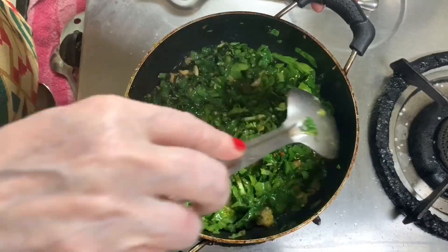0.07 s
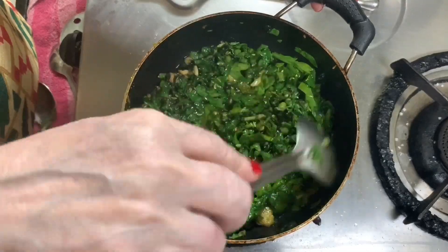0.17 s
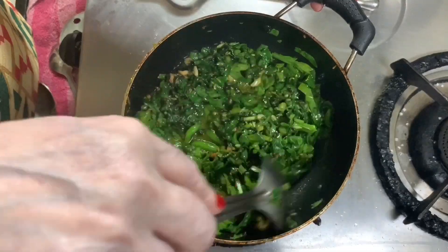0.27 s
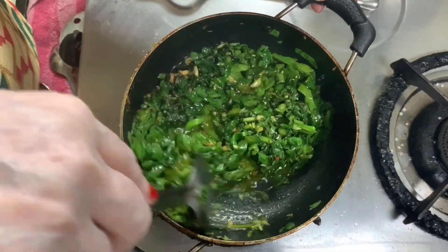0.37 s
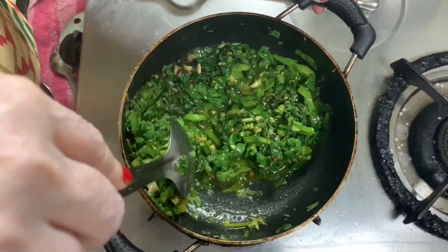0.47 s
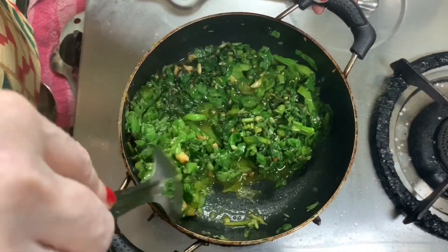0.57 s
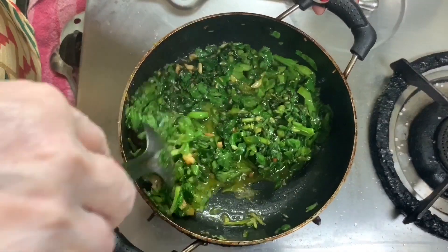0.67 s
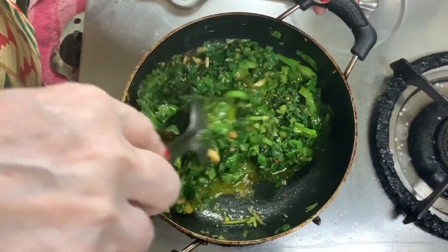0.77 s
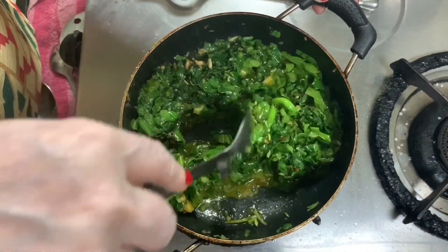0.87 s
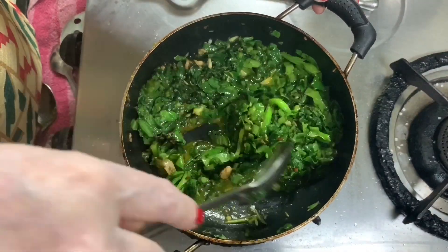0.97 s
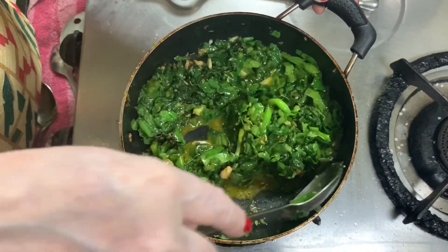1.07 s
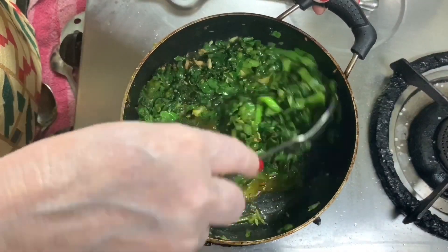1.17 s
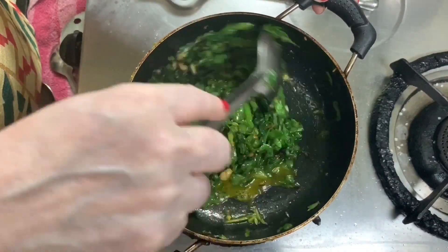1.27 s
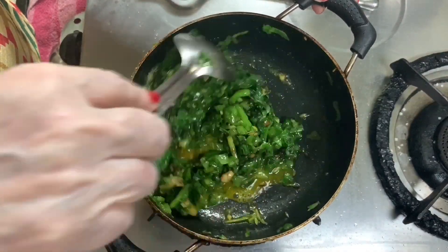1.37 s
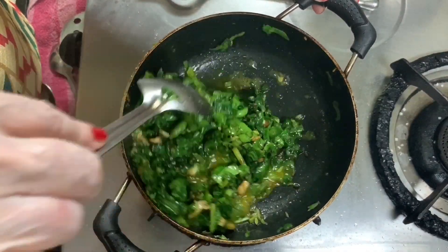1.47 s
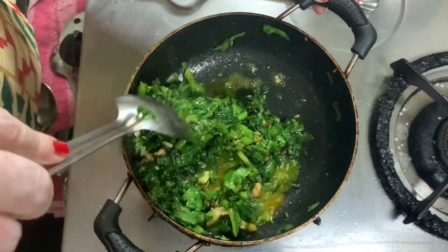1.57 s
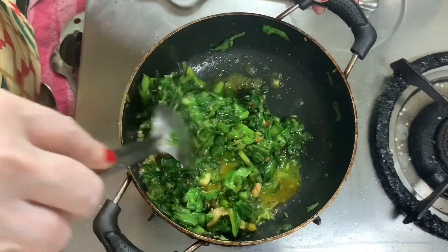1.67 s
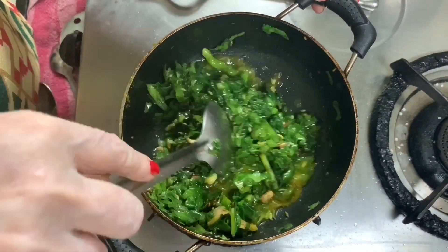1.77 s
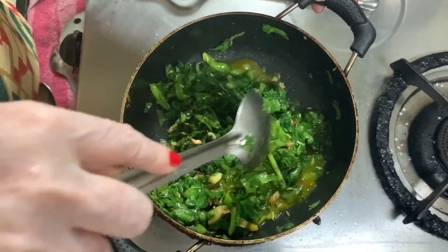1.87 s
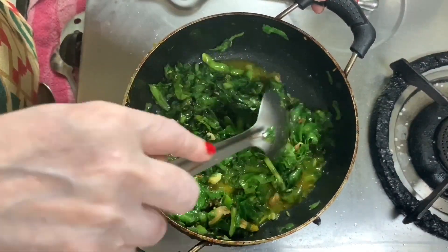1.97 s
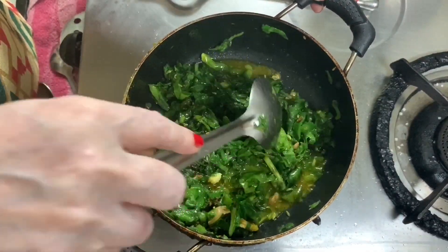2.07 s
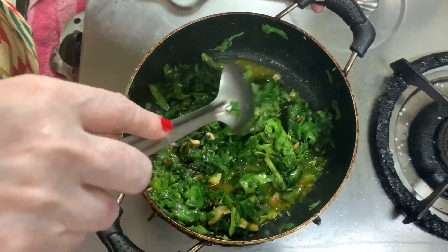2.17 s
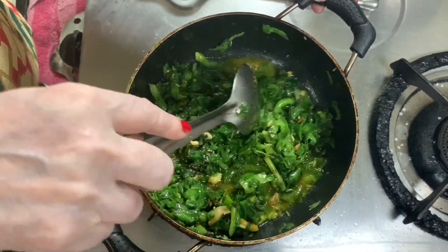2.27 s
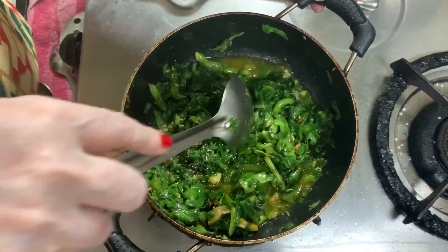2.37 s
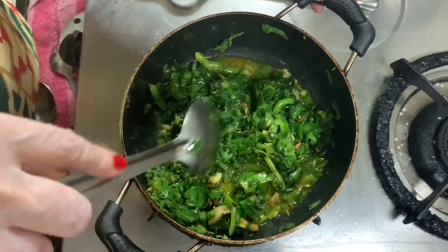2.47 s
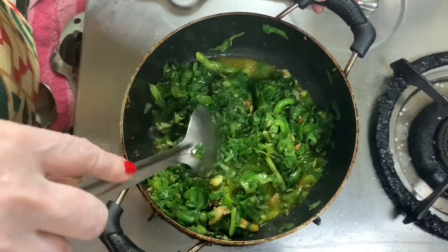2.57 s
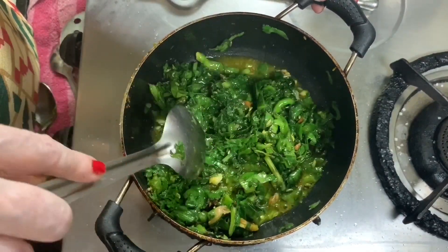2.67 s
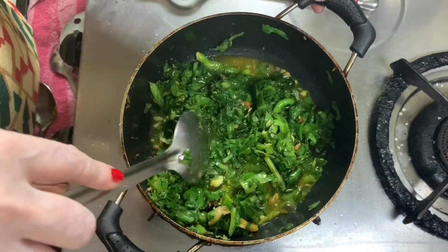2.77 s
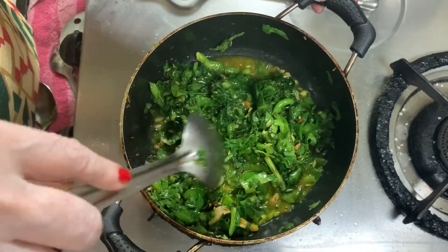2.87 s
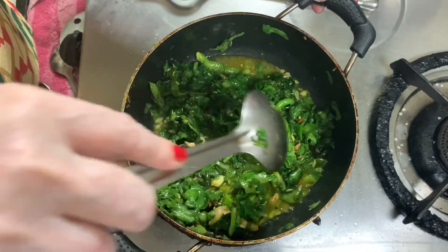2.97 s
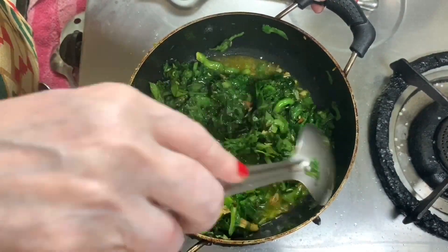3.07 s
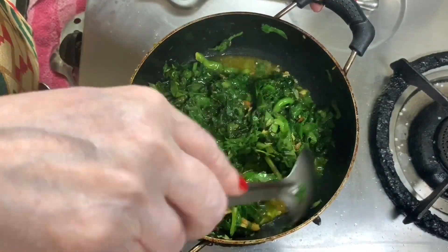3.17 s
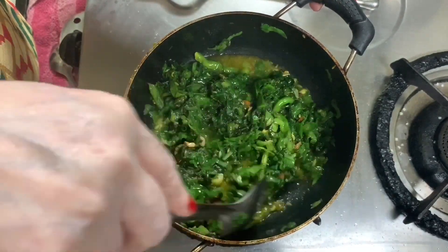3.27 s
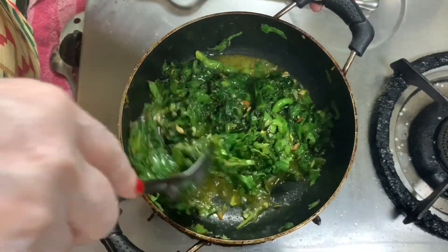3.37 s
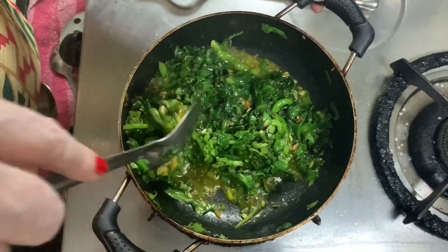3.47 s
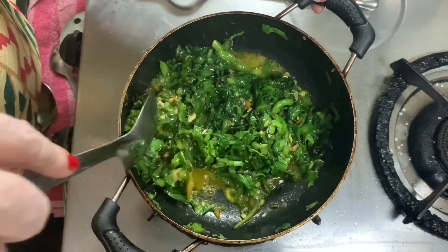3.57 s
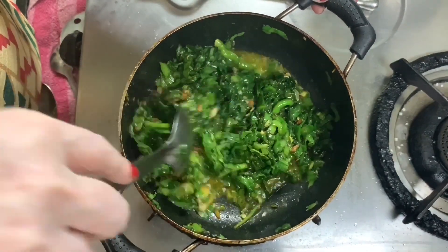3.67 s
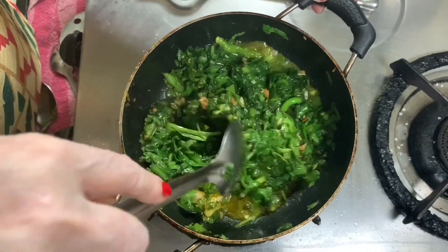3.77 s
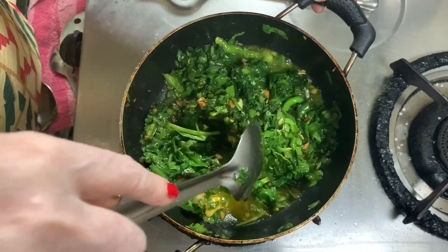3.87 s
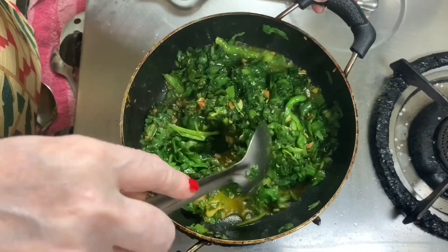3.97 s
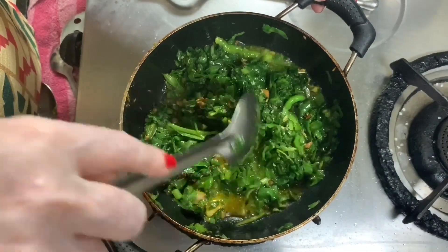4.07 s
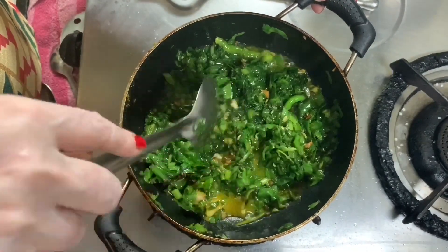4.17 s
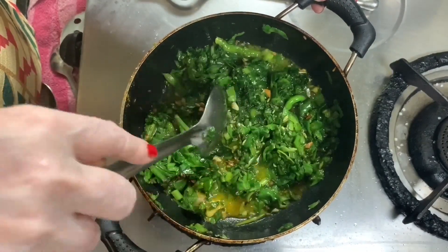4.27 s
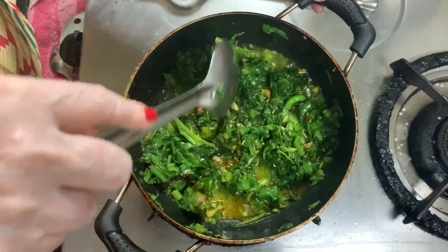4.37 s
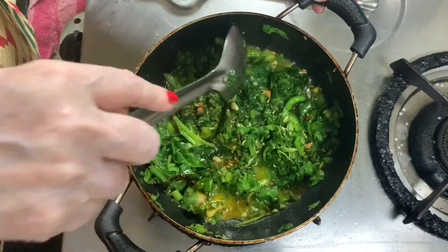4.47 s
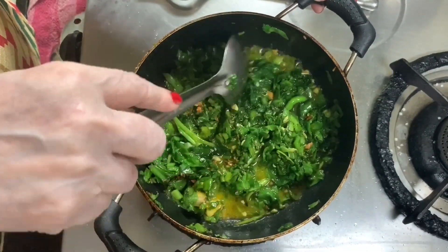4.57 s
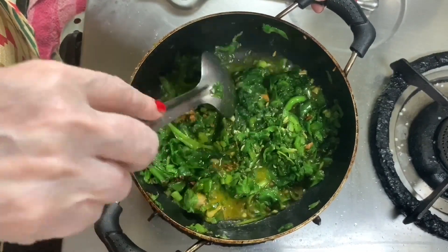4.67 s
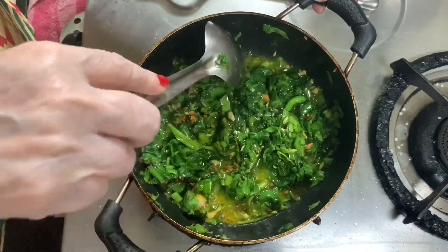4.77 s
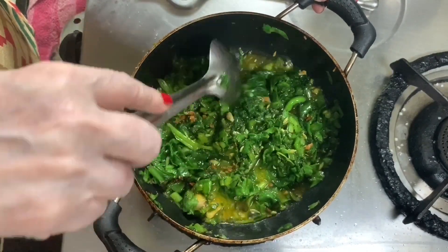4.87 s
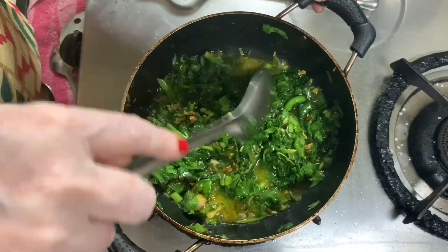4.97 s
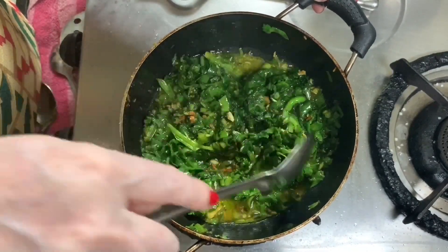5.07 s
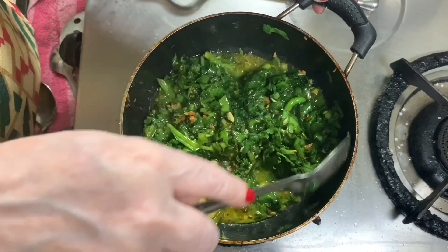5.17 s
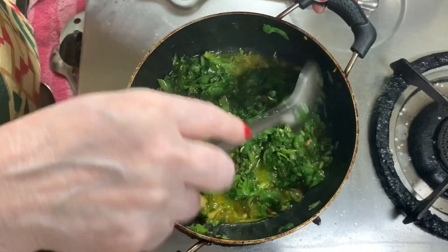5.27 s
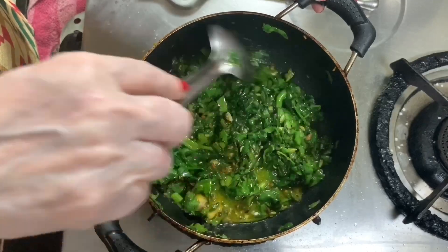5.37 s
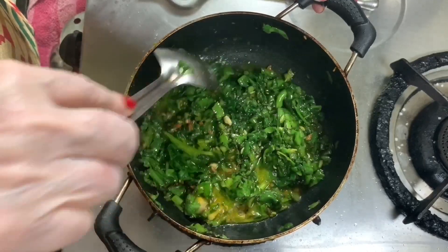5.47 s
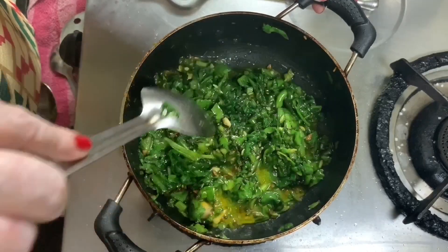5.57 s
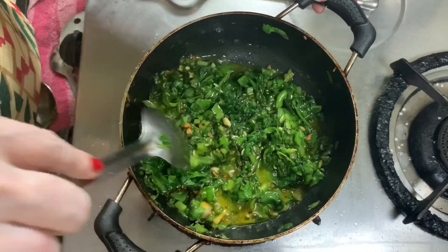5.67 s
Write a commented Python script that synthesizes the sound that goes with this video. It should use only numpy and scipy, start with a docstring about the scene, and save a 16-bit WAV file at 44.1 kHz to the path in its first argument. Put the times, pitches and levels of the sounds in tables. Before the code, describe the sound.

Soft high fizz with finer crackle runs throughout, strongest at first and thinning later. Over it a spoon strikes and drags in a pan: bright taps, dull food-cushioned knocks, short groaning scrapes with tiny squeals. A lull in the middle holds a few oil pops, then louder clanks return, followed by hollow rocking thuds and a last blunt blow. Close, mono, dry with a brief room tail.

```python
"""A steel spoon stirs wet greens in a non-stick pan on a stove, in a small kitchen.
Spoon: filtered cracks and pan modes make clinks and knocks; stick-slip noise makes scrapes and squeals.
Pan: short tone-and-noise thuds rock it on its grate.
Frying: three layers of random snaps, coloured by the bowl, plus a sinking resonance in each opened gap.
Single oil spits are decaying noise bursts; decaying noise tails add the kitchen around spoon and pan."""
import sys
import numpy as np
from scipy import signal
from scipy.fft import rfft, irfft, next_fast_len
from scipy.io import wavfile
from scipy.ndimage import map_coordinates

SR = 44100
rng = np.random.default_rng(int(sys.argv[2]) if len(sys.argv) > 2 else 0)


def to_wav(s):
    """Save 16-bit WAV."""
    ch = np.atleast_2d(s).T  # columns
    pcm = np.round(np.clip(ch, -1, 1) * 32767)  # PCM
    wavfile.write(sys.argv[1], SR, pcm.astype(np.int16))


N = 251370


def amp(db):
    """Decibels to gain."""
    return 10 ** (np.asarray(db) / 20)


def unit(x):
    """Scale to rms 1."""
    return x / np.sqrt(np.mean(x ** 2) + 1e-20)


def unit_energy(x):
    """Scale to energy 1."""
    return x / (np.linalg.norm(x) + 1e-12)


def along(points, hz):
    """Read (Hz, value) points on a log-frequency axis."""
    f, v = np.transpose(points)
    return np.interp(np.log(hz + 1), np.log(f + 1), v)


def wobble(knots_per_s):
    """Smooth random curve through normally distributed knots."""
    knots = rng.standard_normal(int(N * knots_per_s / SR) + 4)
    return map_coordinates(knots, [np.arange(N) * knots_per_s / SR], order=2)


def coloured(x, points):
    """Filter x causally (minimum phase, from the folded cepstrum) to the given spectrum."""
    m = 2 * next_fast_len(len(x) // 2 + 2048)
    gain = amp(along(points, np.fft.rfftfreq(m, 1 / SR)))
    cepstrum = irfft(np.log(gain))
    cepstrum[1:m // 2] *= 2
    cepstrum[m // 2 + 1:] = 0
    response = np.exp(rfft(cepstrum))
    return irfft(rfft(x, m) * response, m)[:len(x)]


def add(track, s, sound):
    """Mix a sound into the track at time s."""
    part = track[max(round(s * SR), 0):][:len(sound)]
    part += sound[:len(part)]


def crackle(snaps_per_s, spread_db, hiss_db):
    """Random one-sample snaps of uneven size over a smooth hiss."""
    hits = rng.random(N) < snaps_per_s / SR
    sizes = amp(spread_db * np.clip(rng.standard_normal(N), -2, 2))
    snaps = hits * rng.choice([-1, 1], N) * sizes
    return unit(unit(snaps) + amp(hiss_db) * rng.standard_normal(N))


def resonance(hz, width_hz):
    """Noise of rms 1 ringing in a resonance whose centre may move."""
    lowpass = signal.butter(2, width_hz / 2, fs=SR, output="sos")
    narrow = signal.sosfilt(lowpass, rng.standard_normal((2, N)))
    phase = 2 * np.pi * np.cumsum(hz) / SR
    return unit(narrow[0] * np.cos(phase) + narrow[1] * np.sin(phase))


# frying strength: (time [s], level [dB])
FRYING_STRENGTH = [(0.0, -31), (0.55, -33.5), (0.95, -36), (1.2, -34), (1.65, -33.5), (2.05, -38),
                   (2.95, -39.5), (3.25, -37), (3.62, -36), (4.1, -40), (4.65, -42), (5.28, -38),
                   (5.5, -42)]
# fine-bubble spectrum: (frequency [Hz], level [dB])
FIZZ_COLOUR = [(2000, -18.5), (5600, -11.5), (6200, -4), (6850, 0.5), (7300, -6), (9600, -0.5),
               (10700, 0.5), (11350, -4), (12400, -2.5), (14000, -5), (15500, 3)]
# larger-bubble spectrum: (frequency [Hz], level [dB])
BUBBLING_COLOUR = [(500, -26), (1900, -19.5), (2250, -5), (2600, 5.5), (3000, 5.5), (3450, 0), (3900, 14.5),
                   (4300, 0), (4700, 5), (5150, 12.5), (5700, 2), (9000, -7.5)]
# juice spectrum: (frequency [Hz], level [dB])
SIMMER_COLOUR = [(25, -14), (100, -8.5), (200, -10.5), (310, 4.5), (450, -2.5), (600, 11.5), (950, 7.5),
                 (1130, -4.5), (1350, 7), (1560, 0.5), (1800, 8.5), (4000, -18)]
CALM_DB = -40  # frying strength when the greens lie still
BUBBLING_DB_PER_DB, SIMMER_DB_PER_DB = 1.16, 0.18  # growth with frying strength


def sizzle(fizz_db=-39, bubbling_db=-48.5, simmer_db=-52.5):
    """Steam bubbles burst: the finest fizz, larger ones bubble, juice simmers under the leaves."""
    times, strengths = np.transpose(FRYING_STRENGTH)
    flare_db = np.interp(np.arange(N) / SR, times, strengths) - CALM_DB
    surge_db = 0.5 * wobble(8.5)
    fine = unit(coloured(crackle(2200, spread_db=-3.0, hiss_db=2.5), FIZZ_COLOUR))
    coarse = unit(coloured(crackle(1200, spread_db=0.5, hiss_db=1.0), BUBBLING_COLOUR))
    juice = unit(coloured(crackle(240, spread_db=6.0, hiss_db=9), SIMMER_COLOUR))
    fine_db = flare_db + fizz_db + surge_db + 1.35 * wobble(40)
    coarse_db = BUBBLING_DB_PER_DB * flare_db + bubbling_db + surge_db + 1.76 * wobble(25)
    juice_db = SIMMER_DB_PER_DB * flare_db + simmer_db + 0.48 * wobble(11)
    return fine * amp(fine_db) + coarse * amp(coarse_db) + juice * amp(juice_db)


# bowl air resonances: (frequency [Hz], 1/e half-width [Hz], lift [dB])
BOWL_RESONANCES = [(2540, 290, 4.5), (4570, 71, 9), (5280, 53, -3.5), (6084, 50, 10.5), (6880, 510, 7),
                   (7775, 380, 8), (8400, 105, 11), (9070, 420, 9), (9880, 210, 1.5), (10710, 900, 7.5),
                   (12500, 290, 11.5), (13760, 430, 10), (14000, 100, -2), (14580, 200, 15.5),
                   (16130, 470, 9)]


def in_bowl(x, echo=0.27, delay_s=0.000909, sway=0.159):
    """The bowl lifts its resonances; an echo off the moving spoon adds a drifting comb."""
    m = next_fast_len(N + SR // 4)
    f = np.fft.rfftfreq(m, 1 / SR)
    lift_db = sum(db * np.exp(-((f - hz) / width) ** 2) for hz, width, db in BOWL_RESONANCES)
    lifted = irfft(rfft(x, m) * amp(lift_db), m)[:N]
    lag = delay_s * SR * np.exp(sway * wobble(2.42))  # samples
    reflected = map_coordinates(lifted, [np.arange(N) - lag])
    return np.std(x) * unit(lifted + echo * reflected)


# gaps opened in the greens: (time [s], relative level [dB])
GAP_OPENINGS = [(0.079, -51), (0.701, -44), (1.05, -45.5), (1.66, -45), (2.15, -44), (2.7, -47),
                (3.4, -48.5), (4.069, -46.5)]
GAP_OPEN_S, GAP_CLOSE_DB_PER_S = 0.01, 15.5
GAP_START_HZ, GAP_HZ, GAP_SINK_S = 4420, 3914, 0.19  # start, end and time constant of the pitch


def hollow(hollow_db=-2, drift=0.014):
    """Sizzle rings in each gap; pitch sinks as the gap widens, level falls as leaves close over it."""
    t = np.arange(N) / SR
    hz, level = np.full(N, float(GAP_HZ)), np.zeros(N)
    for s, db in GAP_OPENINGS:
        age = np.maximum(t - s, 0)
        sinking_hz = GAP_HZ + (GAP_START_HZ - GAP_HZ) * np.exp(-age / GAP_SINK_S)
        hz = np.where(t >= s, sinking_hz, hz)
        opening = 1 - np.exp(-age / GAP_OPEN_S)
        level = np.maximum(level, amp(db - GAP_CLOSE_DB_PER_S * age) * opening)
    return amp(hollow_db) * level * resonance(hz * (1 + drift * wobble(6.2)), width_hz=370)


# pan and spoon modes: (frequency [Hz], mean level [dB], t60 before extra damping [s])
PAN_MODES = [(270, -6, .2), (394, -2, .2), (583, -2, .16), (745, -8, .11), (830, -6, .12), (1015, -9, .15),
             (1170, -11, .13), (1320, -5, .16), (1720, -6, .2), (1815, 0, .12), (2020, -6, .12),
             (2180, -6, .1), (2400, -8, .1), (2560, -7, .1), (2800, -9, .1), (3100, -9, .14),
             (3250, -8, .14), (3850, -7, .14), (4170, -8, .14), (4685, 0, .17), (6200, -9, .1),
             (7070, -2, .12), (7600, -8, .15), (8770, -12, .12), (9595, -3, .14), (9860, -4, .24),
             (10050, -3, .16), (12900, -11, .15)]


def pan_ring(scatter_db, damping):
    """Sum the decaying modes; random strengths and phases stand for where the spoon touches."""
    t = np.arange(SR // 3) / SR
    hz, db, t60 = np.transpose(PAN_MODES)[:, :, None]
    level_db = db + scatter_db * rng.standard_normal(hz.shape) - 60 * damping * t / t60
    tones = np.sin(2 * np.pi * (hz * t + rng.random(hz.shape)))
    return unit_energy(np.sum(amp(level_db) * tones, axis=0))


# spoon against pan; bright = bare wall, dull = food-covered base:
# (time [s], strength [dB], brightness [dB], clank over strength [dB], clank upper limit [Hz])
CONTACT_EVENTS = [(0.0894, -20.5, 15.5, -1, 9500), (0.159, -30.5, -5, 1, 5000),
                  (0.3392, -27.5, -10.5, 2, 3140), (0.562, -23, 5.5, 5, 8040), (1.094, -39.5, 14, 7, 4500),
                  (1.179, -37.5, 2, 2, 3800), (1.592, -24, 9, -0.5, 9000), (3.0593, -18.5, 9.5, -1.5, 9200),
                  (3.169, -30, -6, -3.5, 3040), (3.247, -28.5, 4, 2.5, 1750), (3.2645, -22, -10.5, 2, 1470),
                  (3.533, -14.5, 6, 1.5, 4500), (3.9, -18.5, -13.5, -4, 5360), (5.155, -40, 10, 1, 6000),
                  (5.22, -32.5, 6.5, 4.5, 3970), (5.277, -44, -2, 6, 2400), (5.673, -10.5, -5, 0.5, 2130)]
# base knock spectrum: (frequency [Hz], level [dB])
KNOCK_COLOUR = [(40, -45), (130, -22), (205, -38), (260, -5), (400, -0.5), (600, 4), (800, 6.5), (1050, 2),
                (1380, 8), (1580, -15), (2500, -50), (8000, -67)]
# clank spectrum: (frequency [Hz], level [dB])
CLANK_COLOUR = [(300, -30), (1200, -28), (1580, -9), (1780, 1.5), (2250, 1.5), (2800, 0), (4800, 5.5),
                (5600, 3.5), (12000, -54.5)]
# tick and oil-pop spectrum: (frequency [Hz], level [dB])
TICK_COLOUR = [(800, -97), (4000, -20), (6000, 1.5), (7200, 4), (10000, 5.5), (11500, 0), (13000, 8.5),
               (16000, -18.5)]
BASE_HZ, BASE_OCT, BASE_DB_PER_DB = 1210, 0.31, 0.87  # band that grows as contacts dull
RING_DB, RING_DB_PER_DB = -3, 0.3  # ring relative to crack; grows with brightness
CRACK_T60_S, CRACK_OCT_PER_DB = 0.015, 0.1131  # t60 at zero brightness; longer on bare metal


def contacts(knock_db=23, clank_db=24, tick_db=23, rise_s=0.00044, grit_db=-9):
    """Each contact is a push, a crack of tiny bounces and a ring; food dulls and damps it."""
    out, t = np.zeros(N), np.arange(SR // 3) / SR
    push = signal.unit_impulse(len(t))
    for s, strength, bright, clank, reach_hz in CONTACT_EVENTS:
        ring_db = RING_DB + RING_DB_PER_DB * bright
        crack_t60 = CRACK_T60_S * 2 ** (CRACK_OCT_PER_DB * bright)
        envelope = amp(-60 * t / crack_t60) * (1 - np.exp(-t / rise_s))
        crack = unit_energy(rng.standard_normal(len(t)) * envelope)
        ring = pan_ring(scatter_db=2.5, damping=2.5)
        cushioned = [(hz, db - 10 * np.log10(1 + (hz / reach_hz) ** 12)) for hz, db in CLANK_COLOUR]
        base = [(hz, db - BASE_DB_PER_DB * bright * np.exp(-(np.log2(hz / BASE_HZ) / BASE_OCT) ** 2))
                for hz, db in KNOCK_COLOUR]
        # heavy base takes mostly the push; wall and spoon take every bounce
        layers = ((push + amp(grit_db) * crack, base, knock_db - bright / 2),
                  (crack, cushioned, clank + clank_db),
                  (crack, TICK_COLOUR, tick_db + bright / 2))
        for strike, colour, db in layers:
            direct = unit_energy(coloured(strike, colour))
            ringing = unit_energy(coloured(ring, colour))
            add(out, s, amp(strength + db) * unit_energy(direct + amp(ring_db) * ringing))
    return out


# room decay: (frequency [Hz], t60 [s])
KITCHEN_DECAY = [(200, 0.26), (1500, 0.22), (5000, 0.23), (14000, 0.18)]


def kitchen(x, build_up_s=0.006):
    """Hob and near walls answer within milliseconds, with a new noise tail every half second."""
    out, block = np.zeros(N), SR // 2
    for start in range(0, N, block):
        hz, t, z = signal.stft(rng.standard_normal(block), SR, nperseg=256)
        decay = amp(-60 * t / along(KITCHEN_DECAY, hz)[:, None])
        tail = signal.istft(z * decay, SR, nperseg=256)[1]
        tail *= 1 - np.exp(-(np.arange(len(tail)) / SR / build_up_s) ** 2)
        add(out, start / SR, signal.fftconvolve(x[start:start + block], unit_energy(tail)))
    return out


# thuds on the grate: shoves, plus a few that follow just after contacts, each answered by a lower one: (time
# [s], tone peak [dB], pitch [Hz])
ROCK_EVENTS = [(0.186, -26.5, 652), (0.402, -39, 374), (0.672, -37.5, 586), (0.777, -44, 386),
               (1.088, -28, 666), (1.605, -29.5, 437), (1.957, -42.5, 645), (2.353, -54, 397),
               (3.066, -29.5, 430), (3.276, -25, 570), (4.491, -20.5, 582), (4.7873, -23.5, 590)]
# base rubbing on the grate: (frequency [Hz], level [dB])
THUD_COLOUR = [(60, -43), (195, -47), (260, -5.5), (380, 8), (600, 4), (800, -4.5), (1350, -12.5),
               (1600, -38), (8000, -66)]
THUD_S = 0.0149
FALL_S, FALL_PITCH_RATIO, FALL_DB_PER_DB, FALL_DB = 0.021, 0.705, 1.354, 2  # falling back after a shove
SETTLE_S, SETTLE_HZ, SETTLE_DB = 0.018, 385, -10.5  # settling after each contact


def rocking(rattle_db=-9):
    """The pan shifts with a hollow thud, falls back with a lower one, and settles after contacts."""
    out, t = np.zeros(N), np.arange(int(THUD_S * SR)) / SR
    swell = np.sqrt(np.abs(np.sin(np.pi * t / THUD_S)))
    falls = [(s + FALL_S, FALL_DB_PER_DB * db + FALL_DB, FALL_PITCH_RATIO * hz)
             for s, db, hz in ROCK_EVENTS]
    settles = [(s + SETTLE_S, strength + SETTLE_DB, SETTLE_HZ)
               for s, strength, *_ in CONTACT_EVENTS]
    for s, db, hz in list(ROCK_EVENTS) + falls + settles:
        add(out, s, amp(db) * swell * np.sin(2 * np.pi * hz * t))
        burst = np.pad(swell * rng.standard_normal(len(t)), (0, SR // 20))
        rattle = unit_energy(coloured(burst, THUD_COLOUR))
        add(out, s, amp(db + rattle_db) * np.linalg.norm(swell) * rattle)
    return out


# edge squeals: (time [s], peak [dB], pitch [Hz], length [s])
SQUEAL_EVENTS = [(0.154, -24, 1350, 0.018), (0.269, -29.5, 4724, 0.028), (1.095, -25, 2974, 0.011),
                 (5.22, -26.5, 6990, 0.0069)]


def squeals(jitter=0.004):
    """Slipping briefly locks on to one resonance: a swelling tone of unsteady pitch."""
    out, unsteady = np.zeros(N), 1 + jitter * wobble(300)
    for s, db, hz, length in SQUEAL_EVENTS:
        u = np.linspace(0, 1, int(length * SR))
        phase = 2 * np.pi * hz * np.cumsum(unsteady[int(s * SR):][:len(u)]) / SR
        add(out, s, amp(db) * np.sin(np.pi * u) * np.sin(phase))
    return out


# spoon strokes, relative levels:
# (time [s], length at full contact [s], drag through food [dB], bare edge [dB], chatter [dB])
STROKE_EVENTS = [(0.163, 0.15, -34, -34.5, -43), (1.092, 0.1, -37, -33, -41.5),
                 (2.733, 0.018, -54.5, -55, -64), (3.173, 0.08, -34, -46, -52),
                 (5.197, 0.013, -54, -27.5, -45), (5.223, 0.11, -37.5, -34.5, -31.5)]
# drag through food: (frequency [Hz], level [dB])
DRAG_COLOUR = [(60, -42), (210, -42.5), (300, -11), (400, 4), (490, 0.5), (600, -2), (740, 5), (880, 9),
               (1100, -14.5), (1580, -26), (2500, -46), (8000, -75)]
# edge rasping on the coating: (frequency [Hz], level [dB])
RASP_COLOUR = [(500, -58), (1600, -28), (2250, 3), (2500, -2), (2900, -3), (3250, -11), (3900, -3.5),
               (4300, -3.5), (4800, -20), (5200, -7), (5900, -13), (6900, -3.5), (16000, -13)]
ATTACK_S, RELEASE_S = 0.017, 0.033  # fades outside the full-contact length
GROAN_LEAD_DB = 4  # most by which groan may exceed drag
# level change over a stroke, as food is pushed aside
DRAG_SWEEP_DB, GROAN_SWEEP_DB, CHATTER_SWEEP_DB, RASP_SWEEP_DB = -3.5, 6.5, 9, 2.5


def scrapes(drag_db=-2, groan_db=-3, groan_hz=1370, chatter_db=-2, chatter_hz=1900, rasp_db=-2, ring_db=-9):
    """The edge sticks and slips on the coating: the pan groans, the edge chatters at a shifting pitch."""
    out, t = np.zeros(N), np.arange(N) / SR
    slips = crackle(500, spread_db=8, hiss_db=-2.0) * amp(2.64 * wobble(90))
    ringing = signal.fftconvolve(slips, pan_ring(scatter_db=6.0, damping=1.1))[:N]
    body = unit(slips + amp(ring_db) * ringing)
    dragging, rasping = unit(coloured(body, DRAG_COLOUR)), unit(coloured(body, RASP_COLOUR))
    groaning = resonance(np.full(N, groan_hz), width_hz=115)
    chattering = resonance(chatter_hz * (1 + 0.034 * wobble(25)), width_hz=180)
    for s, length, drag, bare, chatter in STROKE_EVENTS:
        fade = np.minimum((t - s) / ATTACK_S, (s + length - t) / RELEASE_S)
        touching = np.clip(1 + fade, 0, 1)
        way = np.clip((t - s) / length, 0, 1) - 0.5
        groan = min(drag + GROAN_LEAD_DB, bare)  # needs both pressure and bare metal
        pan = amp(drag + drag_db + DRAG_SWEEP_DB * way) * dragging
        pan += amp(groan + groan_db + GROAN_SWEEP_DB * way) * groaning
        edge = amp(chatter + chatter_db + CHATTER_SWEEP_DB * way) * chattering
        edge += amp(bare + rasp_db + RASP_SWEEP_DB * way) * rasping
        out += touching * (pan + edge)
    return out


# oil spitting: (time [s], level [dB], t60 [s])
SPIT_EVENTS = [(2.379, -33.5, 0.018), (2.777, -34.5, 0.012), (2.792, -36.5, 0.029), (2.996, -37, .005)]


def spits():
    """Single droplets burst in the oil: decaying noise with the tick's colour."""
    out, t = np.zeros(N), np.arange(SR // 20) / SR
    for s, db, t60 in SPIT_EVENTS:
        pop = coloured(rng.standard_normal(len(t)) * amp(-60 * t / t60), TICK_COLOUR)
        add(out, s, amp(db) * pop / np.std(pop[:SR // 500]))  # level set over first 2 ms
    return out


def scene(room_db=-4, thud_room_db=-7):
    """Spoon, pan and sizzle sum at one microphone, alike in both channels."""
    frying = in_bowl(sizzle()) + hollow()
    spoon = contacts() + squeals() + scrapes() + spits()
    thuds = rocking()
    room = kitchen(amp(room_db) * spoon + amp(thud_room_db) * thuds)
    mono = frying + spoon + thuds + room
    return np.array([mono, mono])


TOP_HZ = 15780


def record(dry):
    """The hardest blows round off at full scale; nothing passes above the band limit."""
    limited = dry / (1 + np.abs(dry) ** 6) ** (1 / 6)
    m = next_fast_len(N + SR // 2)
    passed = np.fft.rfftfreq(m, 1 / SR) < TOP_HZ
    return irfft(rfft(limited, m) * passed, m)[:, :N]


dry = scene()
out = record(dry)
to_wav(out)
```